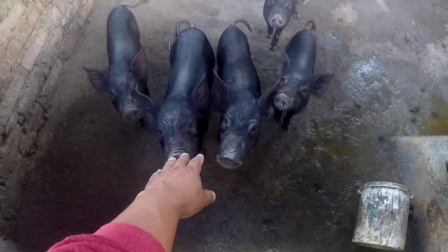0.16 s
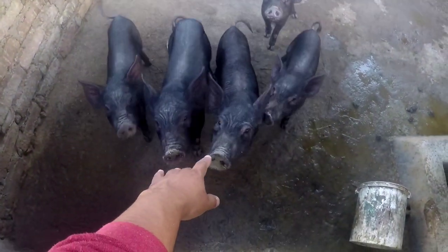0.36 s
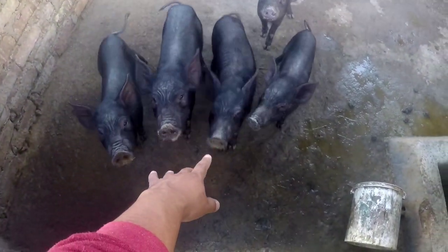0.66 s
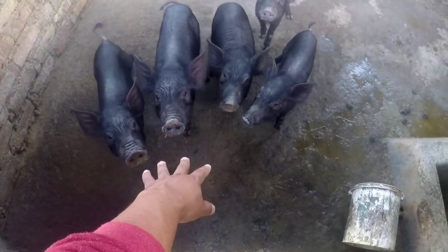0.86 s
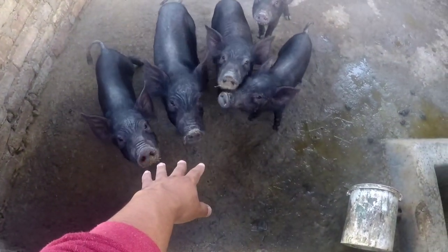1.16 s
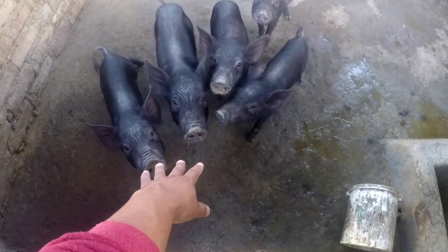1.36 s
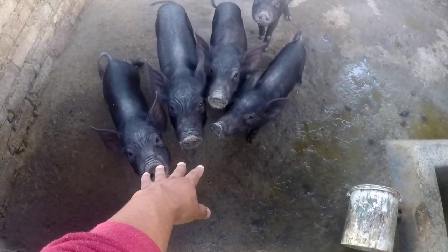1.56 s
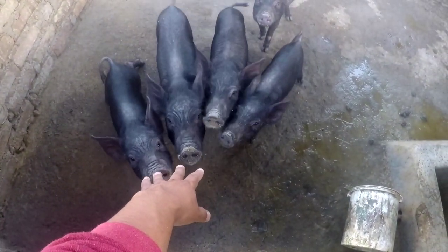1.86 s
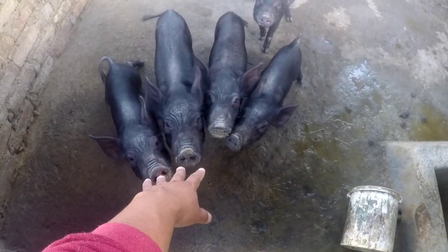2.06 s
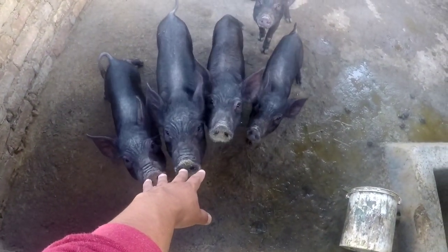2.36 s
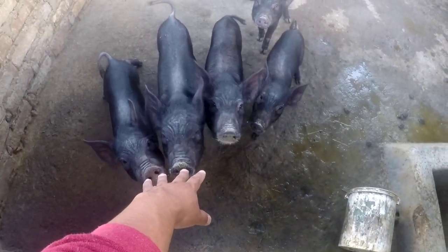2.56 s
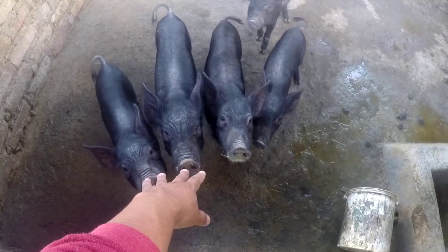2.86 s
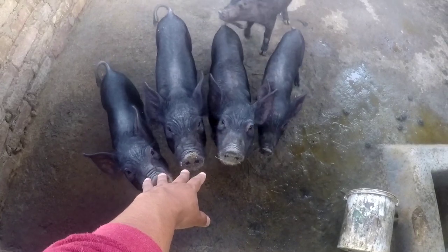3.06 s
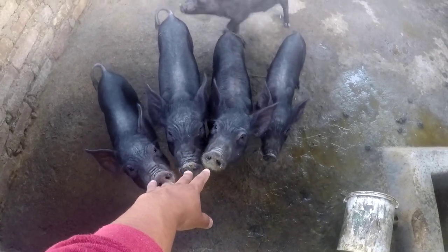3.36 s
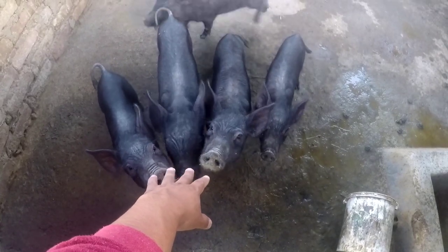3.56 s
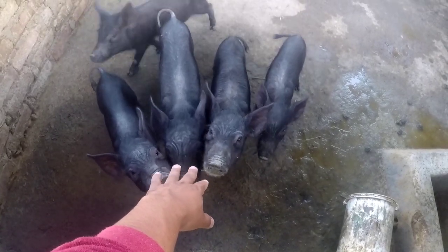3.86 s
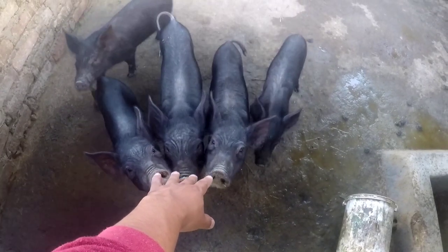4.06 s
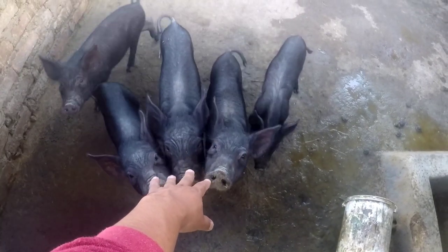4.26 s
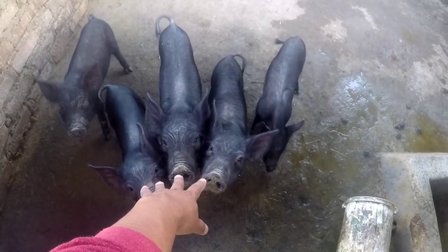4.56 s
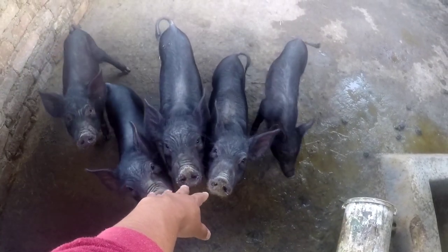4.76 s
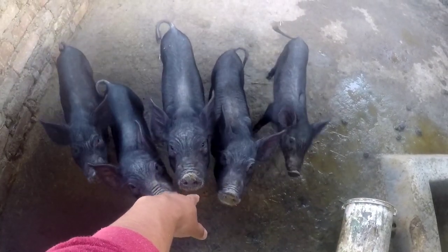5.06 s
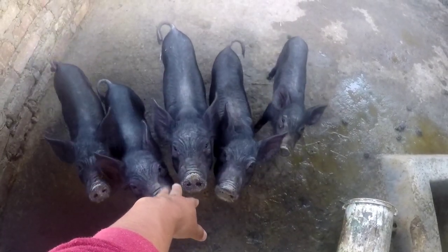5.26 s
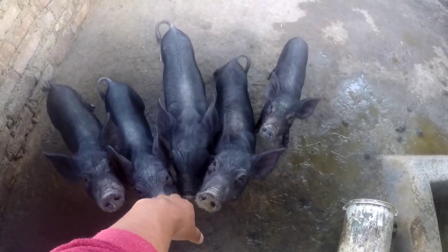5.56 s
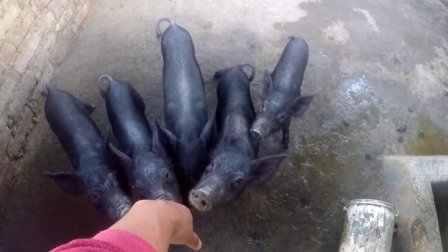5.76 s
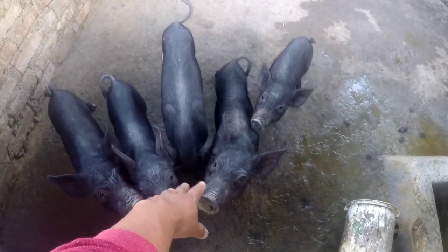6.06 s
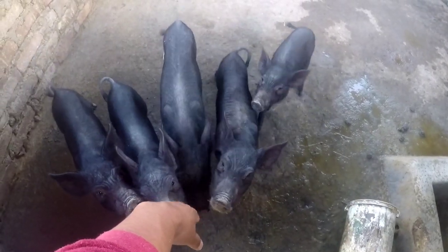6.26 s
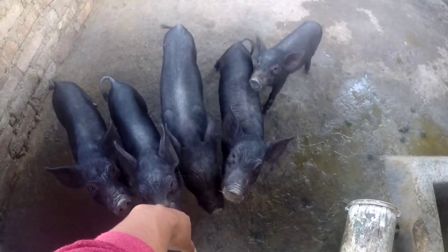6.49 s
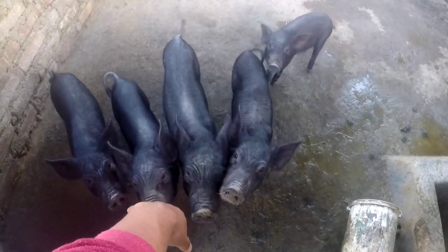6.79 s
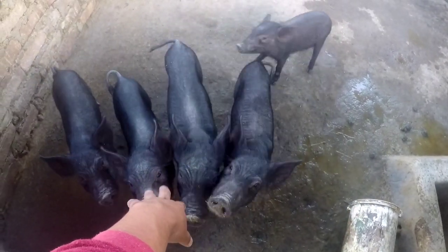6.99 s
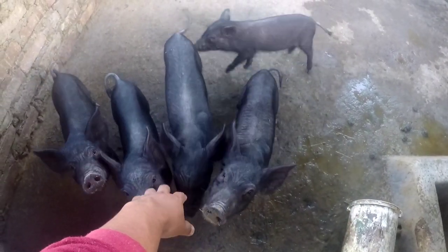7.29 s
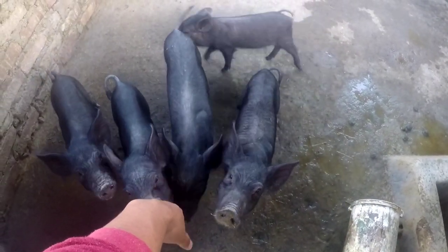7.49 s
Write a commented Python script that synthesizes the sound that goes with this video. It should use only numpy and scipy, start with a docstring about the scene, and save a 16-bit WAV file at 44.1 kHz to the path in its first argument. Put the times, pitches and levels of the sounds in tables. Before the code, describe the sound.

Young piglets give low rattling grunts and short closed-mouth hums in a concrete pen, with wet clicks, snorts and wind rumble on the microphone.

```python
"""A walled concrete pen: piglets give rattling pulsed grunts, near-sinusoidal closed-mouth hums and noise
snuffles; a low standing wave of the pen near 168 Hz sings along. Noise bursts make wet clicks of hooves and
mouths, snorts and an open-mouthed bark; a hard tap rings and chatters. The walls answer with a short decaying
noise tail; a low wash and restless hiss of filtered noise lie behind. Moving air rumbles on the two microphone
ports of a hand-held camera, with dull handling bumps."""
import sys
import numpy as np
from scipy import signal
from scipy.fft import rfft, irfft, next_fast_len
from scipy.io import wavfile
from scipy.ndimage import map_coordinates

SR = 44100
rng = np.random.default_rng(int(sys.argv[2]) if len(sys.argv) > 2 else 0)


def put_to_file(sound):
    """Save the sound as 16-bit audio at rate SR, in the file named by the first command-line argument."""
    columns = np.atleast_2d(sound).T  # one column per channel
    safe = np.clip(columns, -1, 1)
    whole_steps = np.round(safe * 32767)
    wavfile.write(sys.argv[1], SR, whole_steps.astype(np.int16))


N = 336483

# snout resonances: (centre [Hz], width [Hz], relative level [dB])
SNOUT_MODES = [(1103, 213, -14.5), (1586, 162, -7), (2130, 160, 2), (3067, 150, 1), (3528, 240, -4.5),
               (4028, 273, 3)]


def amp(db):
    """Decibels to gain."""
    return 10 ** (np.asarray(db) / 20)


def unit(x):
    """x at rms 1."""
    return x / np.sqrt(np.mean(x ** 2) + 1e-20)


def along(points, hz):
    """(Hz, value) points read on a log frequency axis."""
    f, v = np.transpose(points)
    return np.interp(np.log(hz + 1), np.log(f + 1), v)


def curve(points, t):
    """(s, value) points read at the times t."""
    s, v = np.transpose(points)
    return np.interp(t, s, v)


def seconds(length_s):
    """A time axis."""
    return np.arange(int(length_s * SR)) / SR


def add(track, s, x):
    """Mix x into the track at s seconds."""
    part = track[..., max(round(s * SR), 0):][..., :x.shape[-1]]
    part += x[..., :part.shape[-1]]


def wobble(rate):
    """A smooth random curve, rate knots a second."""
    knots = rng.standard_normal(int(N * rate / SR) + 4)
    return map_coordinates(knots, [np.arange(N) * rate / SR])


def filtered(x, response):
    """x times a complex response of frequency."""
    n = x.shape[-1]
    m = next_fast_len(n + SR // 4)
    return irfft(rfft(x, m) * response(np.fft.rfftfreq(m, 1 / SR)), m)[..., :n]


def resonate(x, modes):
    """x through parallel causal resonances of alternating sign."""
    def response(f):
        total = 0
        for k, (centre, width, db) in enumerate(modes):
            loss = 1j * f * width
            total = total + (-1) ** k * amp(db) * loss / (centre ** 2 - f * f + loss)
        return total
    return filtered(x, response)


def band(x, lo_hz, hi_hz):
    """A causal band-pass."""
    return signal.sosfilt(signal.butter(2, [lo_hz, hi_hz], "band", fs=SR, output="sos"), x)


def puff(envelope, hz, octaves):
    """Noise under the envelope, coloured by a bell round hz."""
    bell = lambda f: np.exp(-(np.log2((f + 1) / hz) / octaves) ** 2 / 4)
    return filtered(envelope * rng.standard_normal(len(envelope)), lambda f: unit(bell(f)))


def arch(t, top_s, end_s, db_per_s, end_db):
    """A gain that swells at a steady dB pace to its peak, then sinks by end_db."""
    return amp(np.interp(t, [0, top_s, max(end_s, top_s)], [-db_per_s * top_s, 0, -end_db]))


def burst(modes, t60, rise_s):
    """A sudden, dying burst of noise that rings resonances; rms about 1 at its start."""
    t = seconds(.15)
    envelope = amp(-60 * t / t60) * (1 - np.exp(-t / rise_s))
    ringing = resonate(envelope * rng.standard_normal(len(t)), modes)
    return unit(ringing) * np.sqrt(np.mean(envelope ** 2))


def ports(x, aside_db):
    """A piglet reaches the two ports out of step, the more so the further aside it stands."""
    # (frequency [Hz], side re mid before aside_db [dB])
    width = [(150, 0), (300, -4), (480, 5), (780, 11.5), (1300, 8.5), (2500, -6), (8000, -6.5)]
    side = filtered(x, lambda hz: 1j * amp(along(width, hz) + aside_db))
    return np.array([x + side, x - side])


def rush(spectrum):
    """Steady stereo noise, its mid at rms 1; left-right likeness varies with frequency."""
    # (frequency [Hz], left-right correlation [-1 to 1])
    alike = [(60, 0.64), (130, 0.48), (290, 0.22), (630, -0.4), (1370, -0.07), (3000, 0.69), (6500, 0.21),
             (14000, -0.34)]

    def mid_side(hz):
        turn = np.arccos(np.clip(along(alike, hz), -1, 1)) / 2
        return amp(along(spectrum, hz)) * [np.cos(turn), np.sin(turn)]
    mid, side = filtered(rng.standard_normal((2, N)), mid_side)
    return np.array([mid + side, mid - side]) / np.std(mid)


def wind(buffet_db=-1, rumble_db=-5, eddy_db=3.0, gust_rise_s=0.112):
    """One airflow drives slow eddies and a quicker rumble on the ports; gusts swell the rumble."""
    # airflow strength: (time [s], relative level [dB])
    strength = [(0, -32), (.85, -29), (1.6, -32), (2.45, -42.5), (3.0, -36), (3.45, -46), (3.85, -34.5),
                (4.4, -33), (4.7, -37.5), (5.0, -34), (5.6, -42.5), (6.55, -55), (7.0, -42), (7.63, -36)]
    # gusts: (strongest [s], dying away [s], level [dB])
    gust_rows = [(.92, 0.23, -40.5), (1.23, 0.182, -32.5), (2.63, 0.2, -39), (3.37, 0.49, -27),
                 (3.74, 0.313, -27.5), (4.6, 0.132, -27.5), (7.3, 0.41, -41.5)]
    # eddy spectrum: (frequency [Hz], relative density [dB/Hz])
    buffet = [(12, -7.5), (24, -8.5), (38, 3), (52, -2), (75, -14.5), (150, -90.5)]
    # rumble spectrum: (frequency [Hz], relative density [dB/Hz])
    rumble = [(35, -42), (58, -2), (72, 6), (90, -6), (120, -5), (160, -14.5), (300, -72), (900, -67.5)]
    t = np.arange(N) / SR
    flow = amp(curve(strength, t) + eddy_db * wobble(8.5))
    gusts = np.zeros(N)
    for s, fall, db in gust_rows:
        gusts += amp(db) * np.interp(t, [s - gust_rise_s, s, s + fall], [0, 1, 0])
    rumble_gain = np.hypot(amp(rumble_db) * flow, gusts)
    return amp(buffet_db) * flow * rush(buffet) + rumble_gain * rush(rumble)


def background(yard_waver_db=1.41, hiss_waver_db=1.5):
    """Two shaped noises: the low wash of the yard and a slightly restless hiss."""
    # wash: (time [s], level [dB])
    yard_level = [(0.0, -48.5), (2.61, -47.5), (3.44, -42.5), (3.74, -40), (4.06, -49), (4.74, -43.5),
                  (5.84, -49.5), (7.2, -36.5), (7.63, -44.5)]
    # hiss: (time [s], level [dB])
    hiss_level = [(0, -48.5), (.32, -49), (.4, -45), (.9, -44), (2.0, -44.5), (3.4, -43.5), (5.7, -45.5),
                  (7.0, -43.5)]
    # wash spectrum: (frequency [Hz], relative density [dB/Hz])
    yard = [(70, -8.5), (160, 2), (300, -3.5), (450, -8), (750, -20.5), (1300, -18), (3000, -107.5)]
    # hiss spectrum: (frequency [Hz], relative density [dB/Hz])
    hiss = [(200, 5.5), (700, 11), (1500, 3.5), (2400, 2), (4200, 2.5), (5000, 1.5), (5800, 7), (7700, 6.5),
            (8200, 0.5), (10500, -6.5), (11300, -16), (13500, -17.5), (15000, -56.5)]
    t = np.arange(N) / SR
    yard_gain = amp(curve(yard_level, t) + yard_waver_db * wobble(19))
    hiss_gain = amp(curve(hiss_level, t) + hiss_waver_db * wobble(50))
    return yard_gain * rush(yard) + hiss_gain * rush(hiss)


def sniffs(level_db=-1, flutter_db=1.48):
    """Short jets of air flutter through the piglets' wet nostrils."""
    # (start [s], nominal length [s], centre [Hz], spread [octaves], relative level [dB])
    jets = [(0.003, 0.0174, 1710, 0.14, -46.5), (0.074, 0.014, 1730, 0.14, -49.5),
            (.135, 0.0217, 1807, 0.177, -47.5), (0.153, 0.0324, 3200, 0.19, -48),
            (0.417, 0.063, 1870, 0.29, -48), (0.83, 0.0223, 1860, 0.84, -40),
            (0.84, 0.0202, 5530, 0.264, -38.5), (1.24, 0.097, 2650, 0.37, -51),
            (3.722, 0.0302, 2397, 0.15, -39), (3.734, 0.0168, 6690, 0.058, -38.5),
            (3.898, 0.0244, 2306, 0.095, -47.5), (6.277, 0.072, 2126, 0.11, -43.5),
            (6.69, 0.14, 2183, 0.117, -48), (6.843, 0.0154, 1950, 0.1, -44.5),
            (6.897, 0.078, 2475, 0.086, -48), (7.081, 0.0324, 4360, 0.27, -37.5)]
    out = np.zeros(N)
    for s, length, hz, octaves, db in jets:
        t = seconds(length * 2.04)
        envelope = np.interp(t, [0, .006, length / 2, t[-1]], [0, 1, 1, 0])
        add(out, s, amp(db + level_db) * puff(envelope, hz, octaves))
    return out * amp(flutter_db * wobble(130))


def folds(t, rate, jitter, scatter_db):
    """Slack vocal folds flap in slow, uneven pulses."""
    chance = rng.standard_normal((40, 2))
    gaps_s = np.exp(jitter * chance[:, 0]) / rate
    at = np.round((np.cumsum(gaps_s) - gaps_s[0]) * SR).astype(int)
    return np.bincount(at, amp(scatter_db * chance[:, 1]), len(t))[:len(t)]


def grunts(nasal_db=-1, throat_db=-3, rasp_db=-2, breathy=0.94, mouth_width_hz=30):
    """Each pulse rings the nose and the pen's low standing wave near 168 Hz, and lets a burst of air rasp
    through throat, mouth and snout."""
    # (start [s], swell [s], length before release [s], relative nasal, throat, rasp levels [dB],
    #  mean pulse rate [1/s], nominal nasal resonance [Hz], sustained-tone power share [0-1],
    #  mouth resonance [Hz], its relative strength [dB], side offset [dB])
    calls = [ (0.005, .008, 0.0216, -38, -43, -59, 90, 329.2, 0.47, 544, 8.5, 5),
             (0.077, 0.0122, 0.021, -47.5, -43.5, -42.5, 97, 302, 0.2, 554, 4.5, 2),
             (0.142, 0.024, 0.028, -42.5, -46, -44, 82, 304, 0, 558, 19.5, 6),
             (2.216, 0.0144, 0.073, -36, -52, -45.5, 69, 315.6, 0.4, 700, -12, 0),
             (2.299, 0.0274, 0.06, -35.5, -49, -54.5, 54.3, 333.7, 0.43, 697, -8, 0),
             (2.594, 0.018, 0.07, -31, -53, -48, 110, 276, 0, 597, -7, 3.5),
             (2.911, 0.0435, 0.196, -37, -52, -51, 59, 284.1, 0.12, 828, 11.5, 2.5),
             (3.074, 0.0195, 0.1014, -30.5, -49.5, -41.5, 88, 331.6, 0.31, 1126, 3.5, 0),
             (3.255, 0.0806, 0.105, -34.5, -49, -52, 56, 353.5, 0.29, 860, 5, 7.5),
             (3.352, 0.0162, 0.074, -23.5, -43.5, -42, 80, 336.1, 0.33, 692, -2, 3),
             (3.492, 0.05, 0.1, -32, -48.5, -47.5, 61, 238.3, 0.32, 830, 4, 2),
             (3.702, 0.0395, 0.075, -27.5, -33.5, -36, 56.7, 152, 0, 1111, -1.5, -13.5),
             (3.856, 0.0103, 0.069, -32, -56, -66, 75, 242.8, 0.03, 805, -7, 8),
             (4.574, 0.0692, 0.1335, -24, -33, -39, 66, 250, 0.71, 677, -3.5, -7.5),
             (5.189, 0.0694, 0.0708, -30.5, -44, -70, 58.5, 290.4, 0.69, 753, 19.5, 5),
             (5.85, 0.051, 0.1016, -30, -44.5, -50.5, 43.2, 246.3, 0.62, 589, -3, -11),
             (6.175, 0.1494, 0.182, -19.5, -33.5, -39.5, 45, 249.4, 0.86, 649, 1.5, -8.5),
             (6.546, 0.1025, 0.1974, -22, -35.5, -43.5, 45.8, 249, 0.89, 813, -5, -13.5),
             (7.001, 0.0164, 0.173, -28.5, -41.5, -50.5, 62, 242.6, 0.38, 813, -5, -3.5),
             (7.062, 0.0704, 0.1094, -30.5, -34, -39, 62.2, 219.8, 0.78, 781, -3, -9),
             (7.21, 0.0428, 0.062, -35, -46.5, -43, 68.5, 306.3, 0.09, 803, 8, -1.5),
             (7.384, 0.0825, 0.1003, -27, -33, -37.5, 66.6, 236.8, 0.76, 773.2, 15, -11), ]
    # throat resonances: (centre [Hz], width [Hz], relative level [dB])
    throat_modes = [(503.7, 178, -4), (597, 125.6, -3), (790, 88, -11.5), (1002, 62, -11.5),
                    (1350, 253, -18.5)]
    # air through the open mouth: (frequency [Hz], relative density [dB/Hz])
    rasp_spectrum = [(700, -15.5), (1300, -9), (2000, 5.5), (2700, -9), (3500, -9), (4250, 3), (5000, -4.5),
                     (7000, -3), (12000, -48.5)]
    swell_db_per_s, fade_db, release_s = 99, 19, 0.0397
    # throat and rasp grow faster as the mouth opens; it is widest at mouth_lead of the swell
    open_db_per_s, shut_db, mouth_lead = 155, 13.5, 0.647
    burst_s, leak = .0055, .15  # airflow decay after a pulse, constant airflow
    opening_lifts = 0.0901  # slope of nasal tone pitch with mouth opening
    out = np.zeros((2, N))
    drift, flutter = 1 + .034 * wobble(55), amp(1.7 * wobble(75))
    for (s, swell, length, nasal, throat, rasp, rate, nasal_hz, tone,
         mouth_hz, mouth_db, aside_db) in calls:
        t = seconds(length + release_s)
        effort = arch(t, swell, length, swell_db_per_s, fade_db)
        opening = arch(t, mouth_lead * swell, length, open_db_per_s, shut_db)

        pulses = folds(t, rate, jitter=0.1102, scatter_db=0.97)
        airflow = signal.lfilter([1], [1, -np.exp(-1 / (burst_s * SR))], pulses) + leak
        air = unit(airflow * rng.standard_normal(len(t)))

        width_hz = 144 * np.exp(-0.375 * tone)  # narrower in tonal grunts
        ring_modes = [(nasal_hz, width_hz, 0), (168, 24, -3)]
        ring = resonate(unit(pulses) + 0.42 * air, ring_modes)
        ring = band(ring, nasal_hz * .5, nasal_hz * 1.418)

        # the nasal resonance also sounds, unsteadily, between the pulses
        now = int(s * SR) + np.arange(len(t))
        pitch_hz = nasal_hz * drift[now] * (1 + opening_lifts * (opening - .5))
        throb = 1 + .3 * np.cos(2 * np.pi * rate * t)
        sine = np.sin(2 * np.pi * np.cumsum(pitch_hz) / SR)
        drone = throb * flutter[now] * sine * np.clip(t / 0.00294, 0, 1)
        nose = np.sqrt(1 - tone) * unit(ring) + np.sqrt(tone) * unit(drone)

        drive = unit(pulses) + breathy * air
        mouth = resonate(drive, throat_modes) + resonate(drive, [(mouth_hz, mouth_width_hz, mouth_db)])
        mouth = band(mouth, 408, 2200)

        # tonal grunts leave through the snout's resonances, rough ones rasp broadly through the mouth
        through_snout = tone ** 2
        snout_air = unit(band(resonate(air, SNOUT_MODES), 800, 5100))
        mouth_air = unit(filtered(air, lambda f: amp(along(rasp_spectrum, f))))
        hoarse = through_snout * snout_air + (1 - through_snout) * mouth_air

        voice = effort * amp(nasal + nasal_db) * unit(nose)
        voice += opening * amp(throat + throat_db) * unit(mouth)
        voice += opening * amp(rasp + rasp_db) * unit(hoarse)
        release = np.clip((t[-1] - t) / release_s, 0, 1)
        add(out, s, ports(voice * release, aside_db))
    return out


def clicks(level_db=4.5, t60=0.01785, rise_s=0.000285, patter_db=-49):
    """Sharp wet noise clicks of hooves and mouths, and a faint random patter of small hooves."""
    # (time [s], relative level [dB], centre [Hz], spread [octaves])
    hits = [(.16, -43.5, 3880, .31), (.7407, -42, 4000, 0.057), (.831, -39, 2480, 0.74),
            (.9228, -31.5, 5200, 0.46), (.9617, -30.5, 5100, 0.416), (1.2316, -38, 5800, 0.16),
            (2.9826, -34.5, 4270, 0.085), (3.385, -37.5, 4220, 0.108), (3.524, -41, 4000, 0.12),
            (3.703, -30, 3100, 0.57), (3.7215, -31.5, 2900, 0.51), (4.52, -36, 4290, 0.064),
            (4.5895, -34.5, 2080, 0.39), (4.608, -36.5, 2200, 0.51), (4.634, -38.5, 4200, .2),
            (5.03, -43, 2700, 0.143), (5.133, -38.5, 1890, 0.172), (5.135, -40.5, 3490, 0.08),
            (5.8192, -32, 3300, 0.34), (6.834, -40, 4250, 0.075)]
    out, t = np.zeros(N), seconds(.1)
    patter = [(u * N / SR, patter_db + 5 * v, 3000 * 2 ** w, .3) for u, v, w in rng.random((50, 3))]
    envelope = amp(-60 * t / t60) * np.clip(t / rise_s, 0, 1)
    for s, db, hz, octaves in list(hits) + patter:
        add(out, s, amp(db + level_db) * puff(envelope, hz, octaves))
    return out


def bumps(rise_s=0.00944):
    """Dull knocks of handling on the camera: low noise under a smooth pulse, with no ring."""
    # (time [s], relative level [dB], centre [Hz])
    knocks = [(0.324, -36.5, 239), (.39, -34.5, 137), (.84, -35, 299.5), (4.37, -27, 120.8),
              (4.967, -34.5, 128)]
    out, t = np.zeros(N), seconds(0.096)
    envelope = t / rise_s * np.exp(1 - t / rise_s)
    for s, db, hz in knocks:
        add(out, s, amp(db) * envelope * unit(puff(np.ones(len(t)), hz, octaves=0.394)))
    return out


def taps():
    """Something small and hard strikes the concrete and chatters; each contact starts all modes at once."""
    # contacts: (time [s], relative peak level [dB])
    contacts = [(1.9156, -26), (1.9171, -13), (1.9195, -21), (1.9241, -25.5), (1.9295, -31.5)]
    # (centre [Hz], width [Hz], relative level [dB])
    tap_modes = [(2082, 140, 2), (2367, 280, 2.5), (2886, 163, 3.5), (3060, 254, -13.5), (3450, 245, -12),
                 (3870, 370, -16)]
    out, blow = np.zeros(N), signal.unit_impulse(SR // 20)
    # one mode at a time, so that all keep the same sign
    ring = band(sum(resonate(blow, [mode]) for mode in tap_modes), 1980, 3860)
    for s, db in contacts:
        add(out, s, amp(db) * ring / np.abs(ring).max())
    return out


def hums(waver=0.0183):
    """With the mouth shut the voice is almost a pure tone that swells and dies; some rows near 168 Hz are the
    pen's low standing wave, ringing as it is stirred."""
    # (start [s], loudest [s], end [s], nominal first pitch [Hz], nominal last pitch [Hz],
    #  relative level [dB], octave re fundamental [dB], side offset [dB])
    calls = [(2.585, 2.604, 2.63, 164.9, 155.8, -25, -2.5, -0.5),
             (2.63, 2.665, 2.77, 153.8, 153, -35.5, -19.5, 8),
             (3.08, 3.112, 3.26, 173.1, 151.7, -37.5, -21.5, -1.5),
             (3.355, 3.374, 3.46, 167.1, 161.7, -33, -13.5, 5.5),
             (3.415, 3.456, 3.49, 401.1, 358, -38.5, -27.5, 11),
             (3.56, 3.616, 3.71, 142.6, 152.7, -29.5, -22.5, 2),
             (3.695, 3.739, 3.775, 170.8, 159.8, -19, -11, -10.5),
             (3.70, 3.75, 3.775, 107.5, 102.4, -19, -26.5, -12),
             (3.89, 3.912, 4.08, 153.6, 154.3, -33.5, -21.5, 4.5),
             (4.773, 4.808, 5.0, 299.7, 280.2, -42.5, -18.5, 0.5),
             (5.0, 5.07, 5.27, 302.5, 275, -44.5, -21, 0), (6.70, 6.742, 6.88, 262.8, 238, -38, -9.5, -8),
             (6.79, 6.834, 6.92, 160.4, 121.7, -39.5, -8.5, -3),
             (6.89, 7.009, 7.05, 167.7, 169.7, -26, -15.5, -9.5),
             (7.04, 7.083, 7.15, 172.1, 162.6, -34.5, -15, 6.5),
             (7.13, 7.213, 7.33, 367.6, 345.6, -40, -20.5, -1),
             (7.18, 7.321, 7.43, 106.5, 86.6, -32.5, -12.5, -1),
             (7.45, 7.49, 7.52, 186.9, 168.6, -28.5, -16.5, -6)]
    out, drift = np.zeros((2, N)), 1 + waver * wobble(45)
    for start, top, end, first_hz, last_hz, db, overtone_db, aside_db in calls:
        t = seconds(end - start)
        pitch_hz = np.linspace(first_hz, last_hz, len(t)) * drift[int(start * SR):][:len(t)]
        phase = 2 * np.pi * np.cumsum(pitch_hz) / SR
        swell = np.interp(start + t, [start, top, end], [0, 1, 0])
        tone = unit(np.sin(phase) + amp(overtone_db) * np.sin(2 * phase))
        add(out, start, ports(amp(db) * swell * tone, aside_db))
    return out


def bark(start_s=3.3478, level_db=-23):
    """A sudden noise blast through the open mouth's resonances, just ahead of a grunt's low body."""
    # (centre [Hz], width [Hz], relative level [dB])
    bark_modes = [(492, 121, 5.5), (813, 136, 0), (1015, 116, 3.5), (1260, 132, 1.5), (1723, 233, -2.5),
                  (2310, 360, -9), (2810, 370, -15.5)]
    blast = np.zeros(N)
    sound = band(burst(bark_modes, t60=0.081, rise_s=0.00109), 300, 3000)
    add(blast, start_s, amp(level_db) * sound)
    return ports(blast, aside_db=0)


def snorts(nostril_hz=4190, nostril_width_hz=530):
    """Air breaks through the wet snout in separate bursts, some brighter than others."""
    # (time [s], relative level [dB], relative nostril resonance level [dB])
    bursts = [(6.2025, -23.5, 11.5), (6.2305, -24.5, -1.5), (6.273, -25.5, -9), (6.5792, -27.5, 0),
              (6.603, -32, -12), (6.621, -27.5, -0.5)]
    out = np.zeros(N)
    for s, db, bright_db in bursts:
        modes = list(SNOUT_MODES[:-1]) + [(nostril_hz, nostril_width_hz, bright_db)]
        add(out, s, amp(db) * band(burst(modes, t60=0.0286, rise_s=.0003), 700, 4320))
    return out


def pen(pair):
    """The concrete walls answer with a noise tail whose decay time varies with frequency."""
    # (frequency [Hz], t60 [s])
    decay = [(150, 0.418), (800, 0.101), (3000, 0.189), (10000, 0.1216)]
    hz, t, z = signal.stft(rng.standard_normal((2, SR // 2)), SR, nperseg=256)
    tail = signal.istft(z * amp(-60 * t / along(decay, hz)[:, None]), SR, nperseg=256)[1]
    delay = int(.004 * SR)
    tail = np.pad(tail / np.linalg.norm(tail[0]), ((0, 0), (delay, 0)))
    return signal.fftconvolve(pair, tail, axes=1)[:, :N]


def nearby(x, share=0.127, lowest_hz=1200):
    """Floor, arm and bucket throw back weak copies of the treble, which ripple its spectrum."""
    delays_s = rng.uniform(0.00098, .007, 6)

    def response(f):
        treble = f * f / (f * f + lowest_hz ** 2)
        return 1 + share * treble * sum(np.exp(-2j * np.pi * f * d) for d in delays_s)
    return filtered(x, response)


def scene():
    """Piglets in their pen, with wind and handling at the camera."""
    voices = grunts() + hums() + bark()
    noises = ports(sniffs() + snorts() + clicks() + taps(), aside_db=-3.0)
    walls = pen(amp(-9.5) * voices + amp(-3.0) * noises)
    airborne = voices + noises + walls + background()
    return nearby(airborne) + bumps() + wind()


def record(dry, top_hz=14600):
    """The port balance varies with frequency, mostly favouring the right; nothing passes above top_hz."""
    # (frequency [Hz], left re right gain [dB])
    tilt = [(30, -18), (70, -5.5), (150, 7.5), (270, -6.5), (700, -3), (1500, 0), (3000, -1.5), (8000, -3),
            (13000, 0)]
    return filtered(dry, lambda hz: amp(np.outer([.5, -.5], along(tilt, hz))) * (hz < top_hz))


dry = scene()
out = record(dry)
put_to_file(out)
```